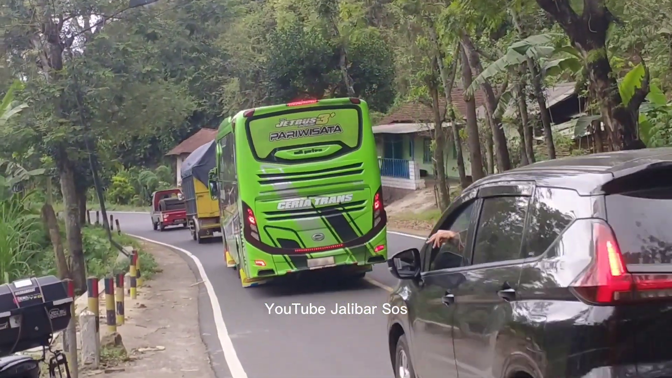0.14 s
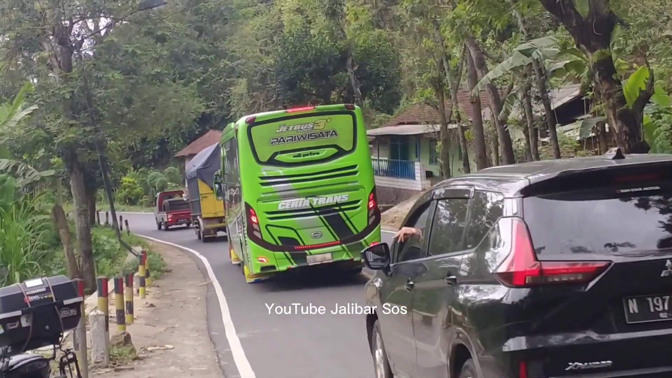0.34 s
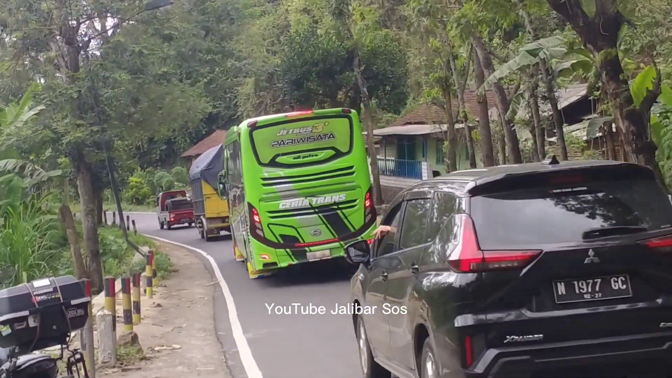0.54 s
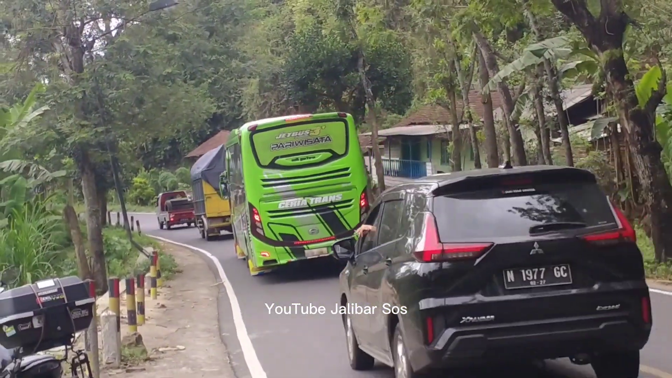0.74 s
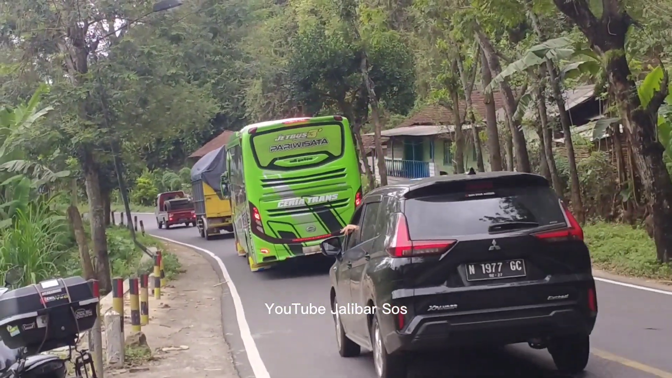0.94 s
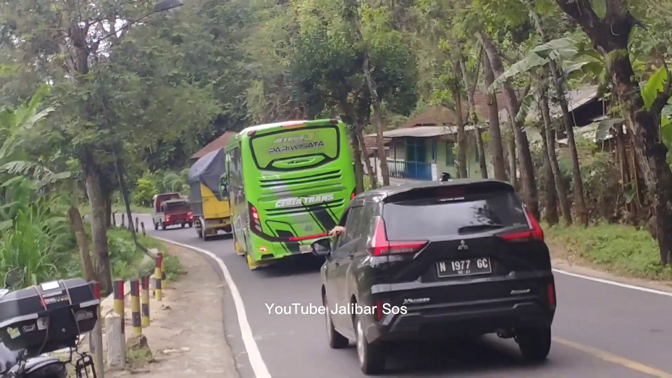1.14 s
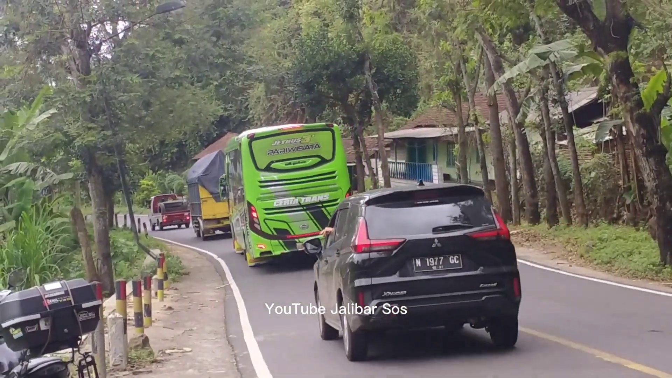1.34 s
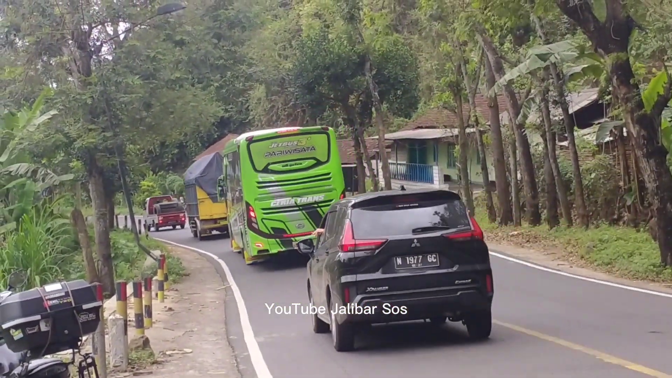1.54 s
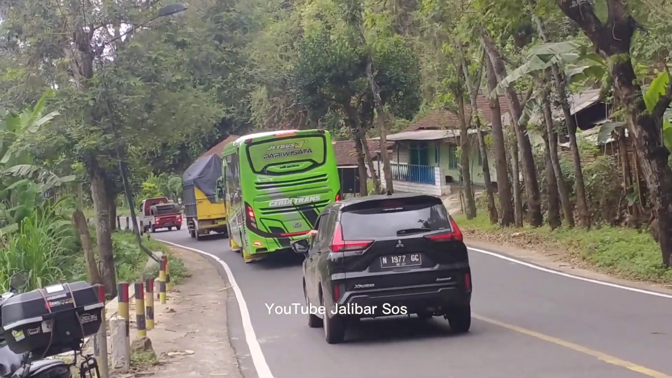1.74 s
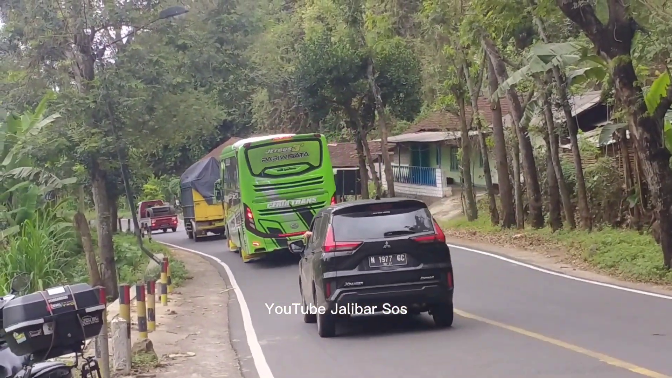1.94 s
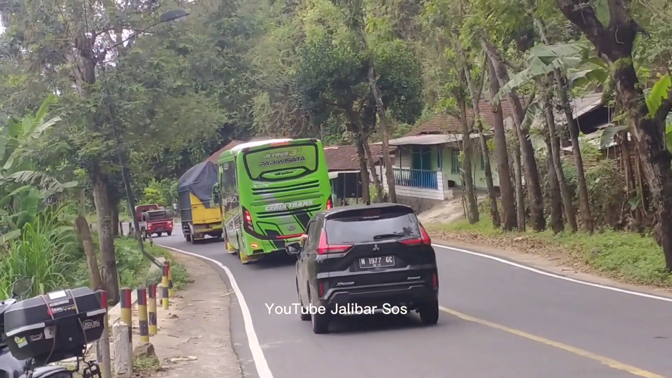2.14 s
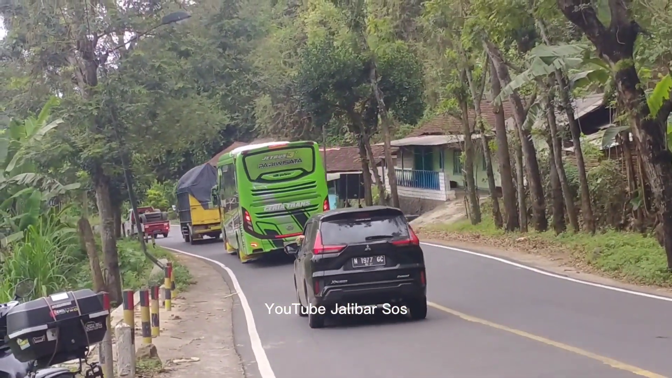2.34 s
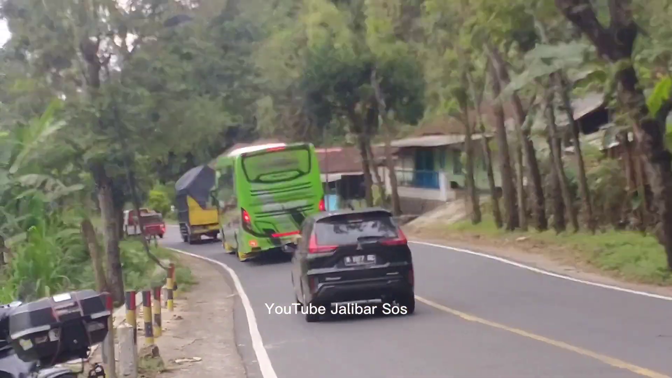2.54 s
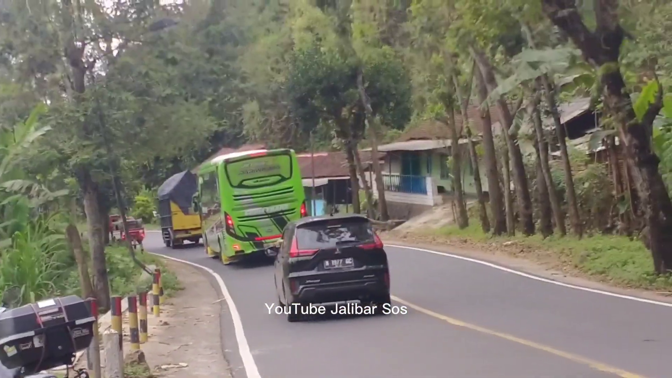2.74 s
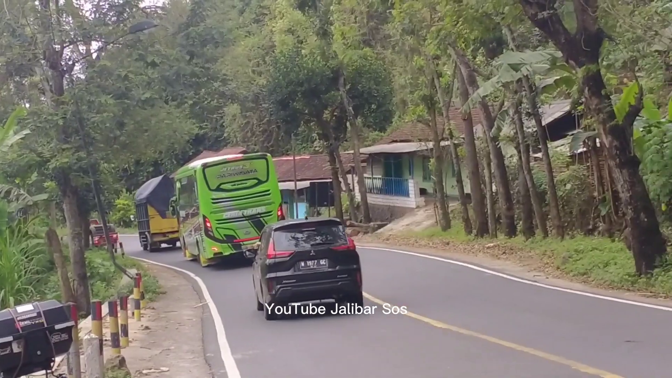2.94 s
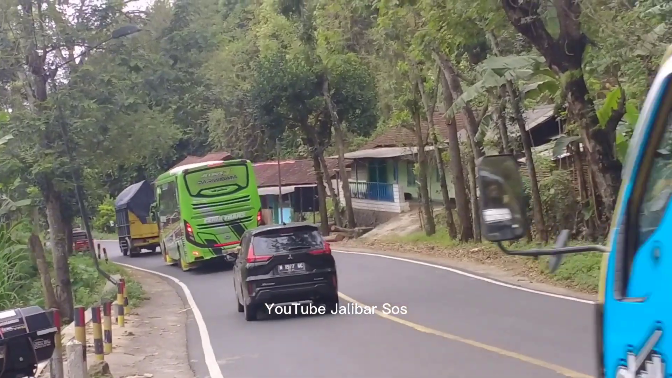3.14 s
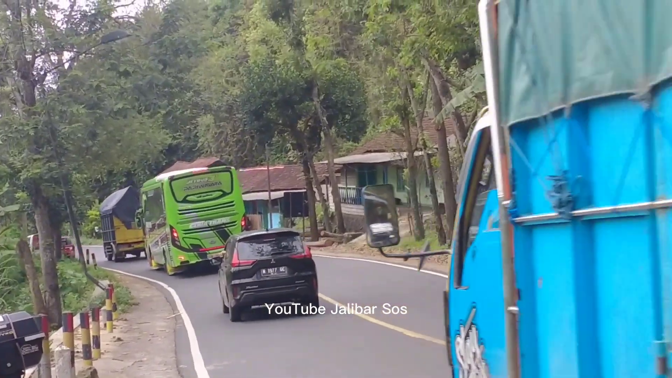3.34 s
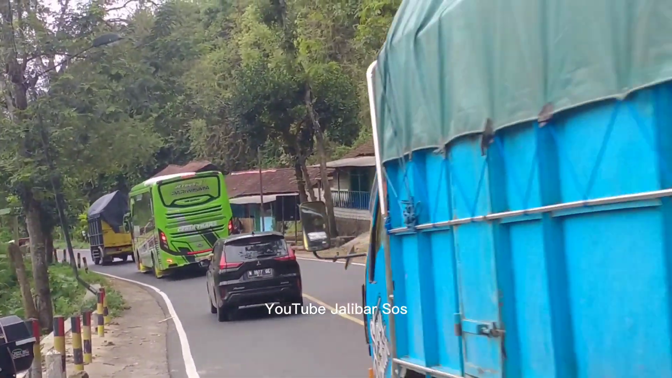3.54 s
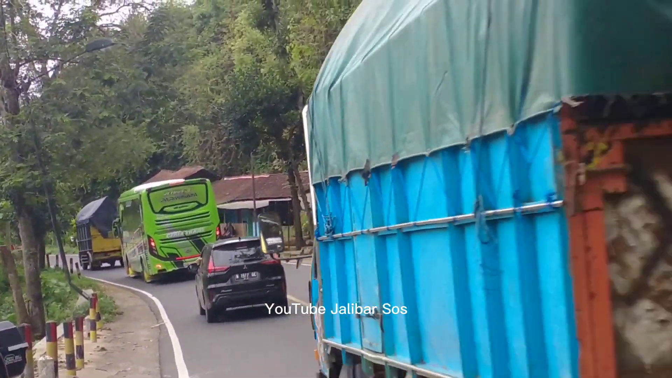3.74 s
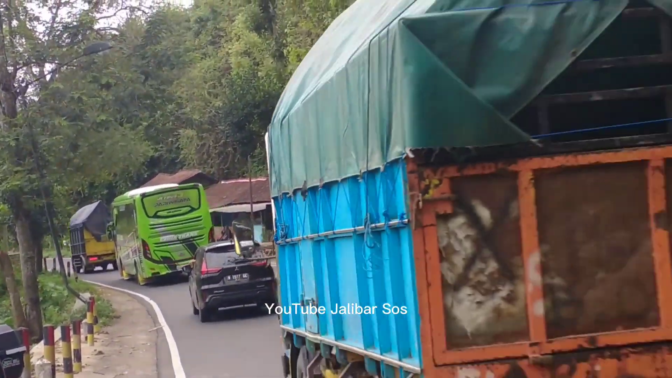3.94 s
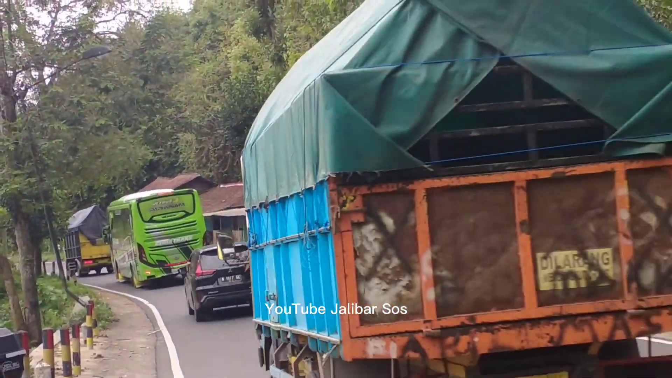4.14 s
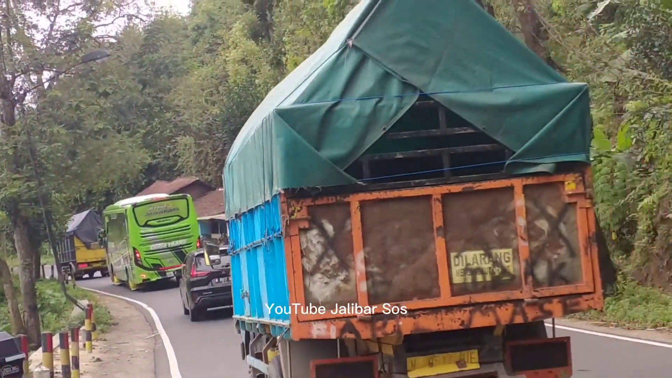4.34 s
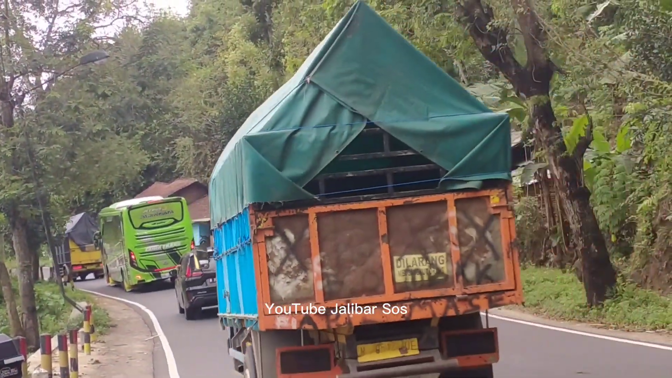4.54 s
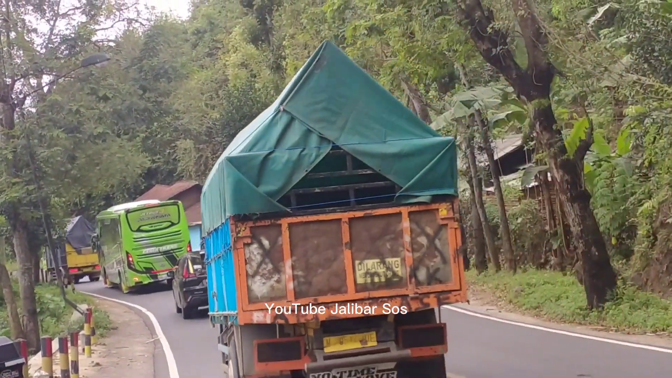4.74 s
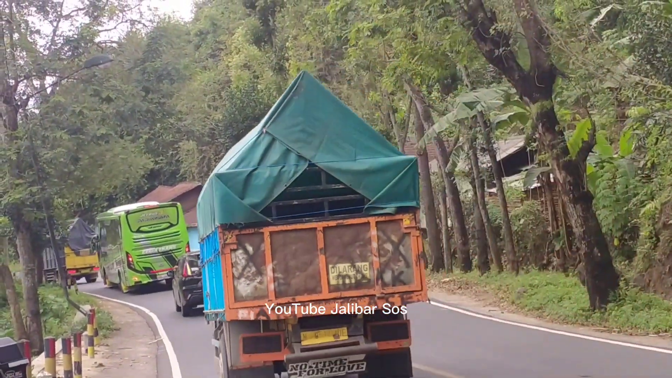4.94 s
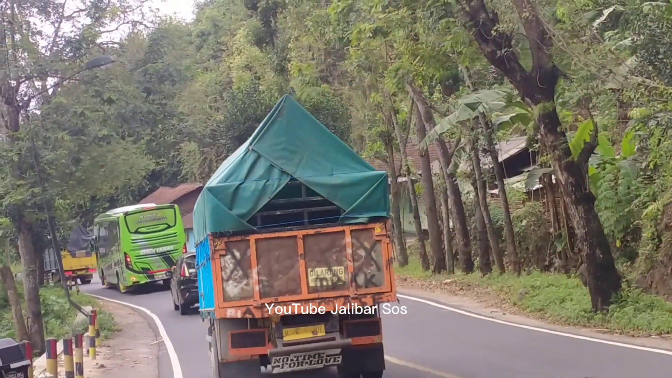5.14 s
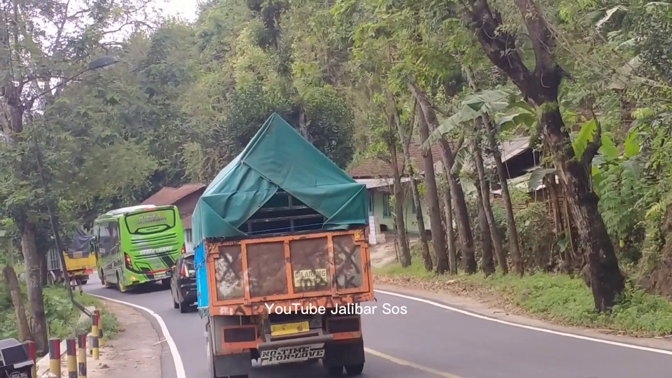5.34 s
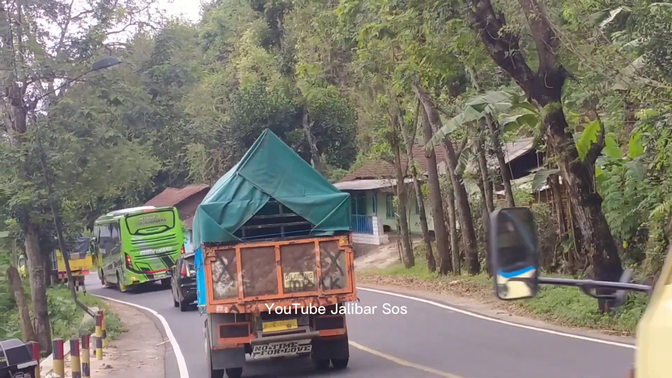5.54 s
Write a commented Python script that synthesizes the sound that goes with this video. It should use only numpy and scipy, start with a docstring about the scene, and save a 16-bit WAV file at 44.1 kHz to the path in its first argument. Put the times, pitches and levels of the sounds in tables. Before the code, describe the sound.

A car whirs off uphill, a heavy truck roars past with deep exhaust boom and rattle, and another diesel approaches, knocking and hissing.

```python
"""Two loaded diesel trucks climb a mountain road and pass close to the microphone, one behind the other.
Exhausts are sums of firing harmonics: the first booms as its pipe sweeps past, the second nears with a growl.
Coloured noise makes the tyre rush, the clatter, the knock and the hiss of air from the second truck.
A car ahead of them hums away, a faint brake squeal comes from up the road, and there are tiny high chirps."""
import sys
import numpy as np
from scipy.fft import rfft, irfft, next_fast_len
from scipy.io import wavfile
from scipy.ndimage import map_coordinates

SR = 44100
rng = np.random.default_rng(int(sys.argv[2]) if len(sys.argv) > 2 else 0)


def file_out(sig):
    """Save sig as 16-bit WAV at sys.argv[1]."""
    # one column per channel
    cols = np.atleast_2d(sig).T
    # limit, then scale
    lim = np.clip(cols, -1, 1)
    pcm = np.round(lim * 32767).astype(np.int16)
    wavfile.write(sys.argv[1], SR, pcm)


N = 250488
T = np.arange(N) / SR  # time in s

# The first truck's engine. Each row: time in seconds, firing rate in Hz.
FIRST_FIRING = [(0, 69.5), (1, 70.55), (2.4, 69.25), (2.7, 68.57), (3.2, 65.24), (4, 64.01), (4.5, 63.0),
                (5.68, 62.2)]
# Colour of the finest hiss, on the road and in the air spit. Each row: frequency in Hz, relative level in dB.
SIZZLE_COLOUR = [(2500, -18), (4200, 0), (5500, 2), (6800, -0.5), (7600, 5), (8000, 3.5), (8400, 5),
                 (9500, 0.5), (11500, -17.5), (13000, -9.5), (15000, -2)]


def first_truck():
    """The pipe rings at the third harmonic of the firing and booms as it sweeps past."""
    # Exhaust boom, the third harmonic. Each row: time in seconds, level in dB.
    pipe_boom = [(0.0, -38), (0.09, -23), (0.13, -31), (0.65, -37), (0.99, -31), (1.34, -40), (1.41, -30),
                 (2.09, -23), (2.4, -35), (2.63, -13), (2.78, -8), (3.1, -8), (3.22, -14), (3.28, -26),
                 (3.39, -12), (3.66, -31), (3.88, -21), (4.6, -30)]
    # Passes of the second harmonic, the firing throb and the growl.
    # Each: closest at in seconds, half-width in seconds, level there in dB, steepness.
    hum_pass = (2.1, .38, -27.2, .72)
    throb_pass = (2.55, .18, -40.5, .55)
    growl_pass = (3.2, .25, -28, .76)
    # Weaker exhaust lines. Each row: multiple of the firing rate, relative level in dB.
    growl_lines = [(2.5, -0.5), (3.5, -1), (4, 0), (4.5, -4.5), (5, 0), (5.5, -1), (6, -5.5), (6.5, -6),
                   (7, -4), (8, -3), (9, -4.5), (10, -16), (11, -20.5), (12, -4.5), (13.5, -11)]

    firing_hz, = curves(FIRST_FIRING)
    boom_db, = curves(pipe_boom)
    turns = cycles(firing_hz)
    smear = .1  # turns
    hum = passing(*hum_pass) * harmonic(turns, 2, smear)
    boom = amp(boom_db) * harmonic(turns, 3, smear)
    throb = passing(*throb_pass) * tone(turns)
    growl = passing(*growl_pass) * rasp(turns, growl_lines, smear, flutter_db=2, drift=0.019)
    return hum + boom + throb + growl + rings(turns, "first", rough=0.061, flutter_db=2)


def second_truck():
    """Its note rises a little, then sinks under load while growl and diesel knock grow with nearness."""
    # Each row: time in seconds, firing rate in Hz.
    firing = [(2, 73.56), (3.45, 75.3), (4.1, 74.09), (5, 71.5), (5.25, 70.25), (5.68, 67.1)]
    # Exhaust in the open. Each row: time in seconds, second, third and fourth harmonic in dB.
    pipe_levels = [(3.5, -20, -27, -35), (4.02, -23, -29, -35), (4.17, -23, -42, -41),
                   (4.33, -22, -25, -35), (4.52, -21, -38, -31), (5.08, -26, -21, -19),
                   (5.51, -16, -18, -23), (5.63, -22, -25, -21), (5.68, -23, -25, -33)]
    # The first truck screens it: clear at in seconds, time to come clear in seconds, screening in dB.
    screen = (3.5, .35, -11)
    # Each pass: closest at in seconds, half-width in seconds, level there in dB, steepness.
    throb_pass = (5.68, .12, -34.5, .74)
    growl_pass = (5.68, 1.1, -25.3, 2.5)
    knock_pass = (5.25, .46, -30.3, 2.2)
    # Weaker exhaust lines. Each row: multiple of the firing rate, relative level in dB.
    growl_lines = [(2.5, -3.5), (3.5, -5), (4.5, 2.5), (5, 4.5), (5.5, -3.5), (6, -3.5), (6.5, -6), (7, -6),
                   (8, -5.5), (8.5, -9), (9, -7.5), (10, -6), (10.5, -20), (11, -8.5), (11.5, -14.5),
                   (12, -7.5), (13, -23)]
    # Each row: frequency in Hz, relative level in dB.
    knock_colour = [(1100, -30.5), (1450, 2), (1670, -3.5), (1880, 3), (2100, -0.5), (2280, -5), (2530, -4),
                    (2800, -9), (3080, -8.5), (3350, -14), (3700, -8.5), (4100, -26.5)]

    firing_hz, = curves(firing)
    turns = cycles(firing_hz)
    smear = .08  # turns
    clear_s, clearing_s, screen_db = screen
    fade_in = np.clip(T / 2, 0, 1) ** 2
    screening = amp(screen_db * np.clip((clear_s - T) / clearing_s, 0, 1))
    exhaust = sum(amp(db) * harmonic(turns, k, smear) for k, db in enumerate(curves(pipe_levels), 2))
    boom = fade_in * screening * exhaust
    throb = passing(*throb_pass) * tone(turns)
    growl = passing(*growl_pass) * rasp(turns, growl_lines, smear, flutter_db=4.0, drift=0.018)
    gate = 2 + 0.55 * knocks(firing_hz, scatter_db=-1, decay=0.32)
    knock = passing(*knock_pass) * amp(wobble(30)) * noise(knock_colour, gate)
    return boom + throb + growl + knock + rings(turns, "second", rough=0.13, flutter_db=2.5)


def air():
    """Air spits and hisses from the second truck and ends in a broader puff, all coloured noise."""
    # Each burst: peak at in seconds, rise in seconds, fall in seconds, level in dB.
    spit_burst = (4.93, .08, .2, -39.5)
    hiss_burst = (5.36, .39, .115, -30)
    puff_burst = (5.365, .022, .065, -25.5)
    # Each row: frequency in Hz, relative level in dB.
    hiss_colour = [(2000, -30), (4300, -15), (4700, -18), (5700, -12.5), (6400, -8), (7100, -8),
                   (7780, -0.5), (8030, -4), (8200, -30), (10000, -35), (14000, -59)]
    puff_colour = [(600, -33), (1300, 3), (2500, 5.5), (3400, 2), (4300, -8.5), (4800, 3), (7800, -8),
                   (8300, -33), (12000, -57)]

    spit = burst(*spit_burst) * noise(SIZZLE_COLOUR)
    hiss = burst(*hiss_burst) * amp(0.62 * wobble(30)) * noise(hiss_colour)
    puff = burst(*puff_burst) * noise(puff_colour)
    return spit + hiss + puff


def road():
    """Bodies rumble, tyres roar, and the first truck's machinery clatters with its firing, shaken by bumps."""
    # Wheels and bodies going by: car, first truck head-on, its front wheels, rear wheels, tail, second truck.
    # Each row: loudest at in seconds, half-width in seconds, rumble, tyre roar, clatter and sizzle in dB.
    passes = [(0.1, .4, -37.5, -40.8, -38, -55), (1.75, .3, -52, -54, -38.3, -52.2),
              (2.55, .26, -40, -28, -30.8, -42.5), (3.25, .24, -21.8, -30.4, -32.5, -39.8),
              (4.2, .55, -26.3, -38, -36, -47.6), (5.68, .5, -30.5, -27.4, -33.3, -39.7)]
    # Traffic farther off: rumble, tyre roar, clatter and sizzle in dB.
    far_traffic = (-37.5, -45.2, -46, -59)
    # The sizzle dips briefly: lowest at in seconds, fall in seconds, recovery in seconds, depth in dB.
    sizzle_dip = (5.39, .14, .06, -12)
    # Closest at in seconds, half-width in seconds, level there in dB, steepness.
    gears_pass = (2.5, .6, -35.7, 1.7)
    # Engine bay, open to the road past the cab: peak at in seconds, rise and fall in seconds, level in dB.
    bay_burst = (3.19, .07, .56, -28.6)
    # Each row: frequency in Hz, relative level in dB.
    rumble_colour = [(20, -35), (45, -29.5), (70, -20), (110, 0), (170, 2), (250, -0.5), (350, 1.5),
                     (480, -10.5), (700, -26), (1500, -44.5)]
    tyre_colour = [(200, -22), (400, 0.5), (550, 0), (850, 0), (1100, -2), (1500, -9.5), (2500, -30),
                   (5000, -46)]
    clatter_colour = [(700, -37), (1250, -4), (1620, 0), (1900, -1), (2300, -4), (2600, -6.5), (2900, -9),
                      (3500, -13), (4100, -21.5), (6000, -27), (8000, -22.5), (11000, -46)]
    gears_colour = [(1250, -35), (1480, -4.5), (1600, 6), (1720, -4), (1900, -6), (2300, -31.5)]
    bay_colour = [(550, -29), (780, -0.5), (1000, 4.5), (1130, 1), (1300, -26), (1800, -14), (2300, -0.5),
                  (2700, -18), (3500, -13.5), (4500, -31.5)]

    steep = 1.1  # how sharply the noise falls with distance
    power = sum(passing(s, half, np.array(levels_db)[:, None], steep) ** 2 for s, half, *levels_db in passes)
    far_power = amp(far_traffic)[:, None] ** 2
    rumble, tyres, clatter, sizzle = np.sqrt(power + far_power)
    firing_hz, = curves(FIRST_FIRING)
    gate = 2.5 + 0.31 * knocks(firing_hz, scatter_db=3, decay=0.43)
    *dip, dip_db = sizzle_dip
    treble_db = dip_db * swell(*dip) + 0.7 * wobble(28)
    treble = sizzle * amp(treble_db) * noise(SIZZLE_COLOUR, 1.0 + gate)
    rattle = clatter * amp(.6 * wobble(26)) * noise(clatter_colour, gate)
    gears = passing(*gears_pass) * amp(1.3 * wobble(30)) * noise(gears_colour, gate)
    bay = burst(*bay_burst) * amp(1.3 * wobble(35)) * noise(bay_colour, gate)
    return rumble * noise(rumble_colour) + tyres * noise(tyre_colour) + rattle + gears + bay + treble


def car():
    """A smooth petrol hum, one wavering tone, and a light whir of noise, fading up the road."""
    # Each row: time in seconds, engine note in Hz, mean level in dB.
    engine_note = [(0, 168.2, -36.5), (.5, 164, -31.5), (1, 158.5, -38), (1.4, 155.2, -37), (2, 151.4, -42),
                   (2.6, 150, -70)]
    # Closest at in seconds, half-width in seconds, level there in dB, steepness.
    whir_pass = (.15, .5, -47, 1.4)
    # Each row: frequency in Hz, relative level in dB.
    whir_colour = [(1900, -25), (2550, 0), (3100, -1), (3600, -12), (4600, -30), (8000, -45)]

    hz, db = curves(engine_note)
    hum = amp(db + 0.79 * wobble(8.5)) * tone(cycles(hz))
    return hum + passing(*whir_pass) * noise(whir_colour)


def brake():
    """A thin squeal that comes and goes, a tone unsteady in pitch and level."""
    # Each row: peak at in seconds, mean pitch in Hz, mean level in dB, half-length in seconds.
    squeals = [(.11, 2655, -43, .07), (.3, 2615, -55, .15), (.6, 2560, -48, .05), (1.4, 2605, -48, .12),
               (1.61, 2640, -42.5, .08), (1.9, 2610, -57, .2)]
    return sum(burst(s, length, length, db + 2.5 * wobble(40)) * tone(cycles(hz + 22 * wobble(110)))
               for s, hz, db, length in squeals)


def chirps(length=.008):
    """Tiny, very high squeaks: narrow noise in bells of the given half-length in seconds."""
    # Each row: peak at in seconds, centre in Hz, band half-width in Hz, level in dB.
    squeaks = [(1.505, 15050, 250, -53), (1.935, 15000, 300, -56), (2.005, 13900, 450, -51),
               (2.215, 14400, 900, -48), (2.347, 13900, 1100, -47), (2.42, 14000, 350, -51),
               (4.55, 13700, 1100, -46)]
    shape = [(-2, -40), (-1, -4), (0, 0), (1, -4), (2, -40)]  # (half-widths off centre, dB)
    total = 0
    for s, hz, width, db in squeaks:
        band = [(hz + offset * width, band_db) for offset, band_db in shape]
        total = total + burst(s, length, length, db) * noise(band)
    return total


def harmonic(turns, k, smear):
    """One exhaust harmonic; the pipe lets the highs out first, so each pulse is a falling blip."""
    return tone(k * turns + smear * k * k)


def rasp(turns, lines, smear, flutter_db, drift):
    """Exhaust harmonics, each wavering; unequal cylinders add the lines halfway between them."""
    return unit(sum(amp(db + flutter_db * wobble(5.5)) * harmonic(turns + drift * wobble(14), k, smear)
                    for k, db in lines))


def rings(turns, truck, rough, flutter_db):
    """Panels ring: single engine harmonics swell and fade, unsteady in level and pitch."""
    # Each row: truck, peak at in seconds, multiple of the firing rate, mean level in dB, half-length in seconds.
    panels = [("first", 0.11, 4, -37, 0.22), ("first", 2.575, 5.5, -35, 0.084),
              ("first", 2.71, 8, -30, 0.15), ("first", 2.717, 10, -38, 0.088),
              ("first", 2.86, 4.5, -35.5, .1), ("first", 3.032, 9, -30, 0.056),
              ("first", 3.27, 15, -35, 0.085), ("first", 3.304, 6.5, -31, 0.17),
              ("second", 4.65, 10, -40.5, 0.072), ("second", 4.85, 5.5, -31, 0.18),
              ("second", 5.03, 12, -36, 0.12), ("second", 5.15, 11, -29.5, 0.1),
              ("second", 5.3, 10, -32, 0.044), ("second", 5.3, 6, -31.5, 0.11),
              ("second", 5.62, 12, -27.5, 0.083), ("second", 5.63, 5, -28.5, .12)]
    return sum(burst(s, length, length, db + flutter_db * wobble(45)) * tone(k * turns + rough * wobble(50))
               for which, s, k, db, length in panels if which == truck)


def knocks(firing_hz, scatter_db, decay):
    """One sharp swell for each firing, in a four-cylinder pattern with chance on top."""
    turns = cycles(firing_hz)
    stroke = turns.astype(int)
    chance = rng.standard_normal(size=1024)[stroke]
    pattern = np.cos(np.pi * stroke) / 2 + np.cos(np.pi * stroke / 2) / 2
    return unit(amp(scatter_db * (chance + pattern)) * np.exp(-(turns % 1) / decay))


def passing(s, half, db, steep):
    """Gain of a straight drive-by, closest at s; steepness 1 spreads evenly, 2 beams sideways."""
    return amp(db) * np.hypot(1, (T - s) / half) ** -steep


def swell(s, rise, fall):
    """A bell that peaks at 1 at time s."""
    return np.exp(-((T - s) / np.where(T < s, rise, fall)) ** 2)


def burst(s, rise, fall, db):
    """Gain of a sound that swells and dies away."""
    return amp(db) * swell(s, rise, fall)


def amp(db):
    """Decibels to gain."""
    return 10 ** (np.asarray(db) / 20)


def unit(x):
    """Scale to rms 1."""
    return x / np.sqrt(np.mean(x ** 2) + 1e-20)


def along(points, hz):
    """Read (Hz, value) points on a log axis."""
    f, v = np.transpose(points)
    return np.interp(np.log(hz + 1), np.log(f + 1), v)


def curves(rows):
    """One value per sample for each column after the time."""
    s, *cols = np.transpose(rows)
    return [np.interp(T, s, c) for c in cols]


def wobble(rate):
    """A smooth random curve, rate knots a second."""
    knots = rng.standard_normal(int(N * rate / SR) + 4)
    coarse = T[::32]  # the curve is slow enough to draw at every 32nd sample
    return np.interp(T, coarse, map_coordinates(knots, [coarse * rate]))


def filtered(x, response):
    """x times a response of frequency."""
    m = next_fast_len(N + SR // 2)
    return irfft(rfft(x, m) * response(np.fft.rfftfreq(m, 1 / SR)), m)[:N]


def noise(colour, gate=1):
    """Gated noise through a colour, rms 1."""
    return unit(filtered(gate * rng.standard_normal(N), lambda hz: amp(along(colour, hz))))


def cycles(hz):
    """Cycles completed at a changing rate, from a random start."""
    return np.cumsum(hz) / SR + rng.random()


def tone(turns):
    """A cosine of rms 1."""
    return np.sqrt(2) * np.cos(2 * np.pi * turns)


def scene():
    """All the traffic, heard from the roadside."""
    return (first_truck() + second_truck() + air() + road() + car() + brake() + chirps())[None]


def record(dry):
    """The microphone channel keeps nothing above its band limit."""
    top_hz = 15550
    return filtered(dry[0], lambda hz: hz < top_hz)[None]


dry = scene()
out = record(dry)
file_out(out)
```